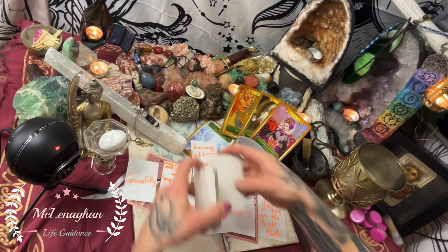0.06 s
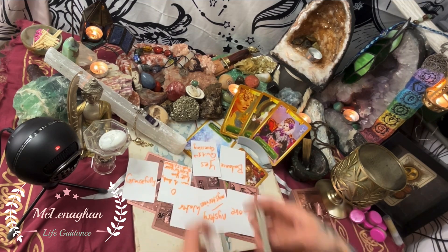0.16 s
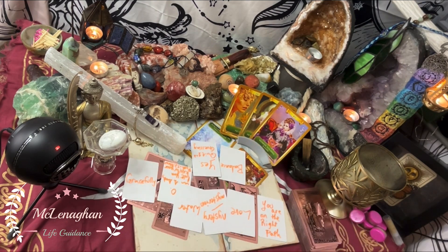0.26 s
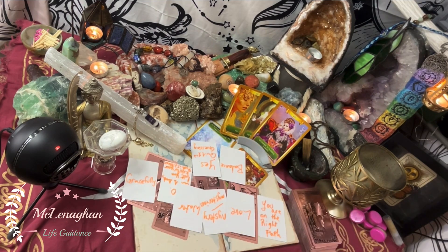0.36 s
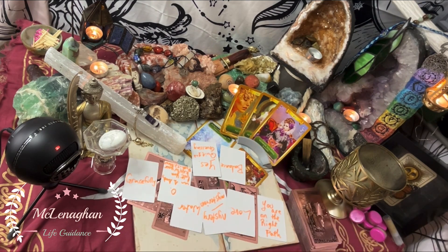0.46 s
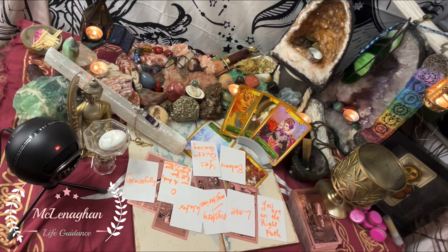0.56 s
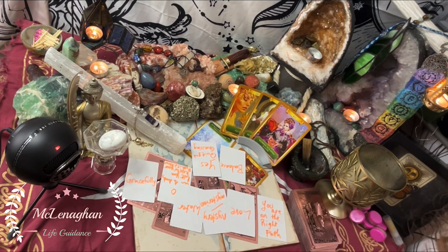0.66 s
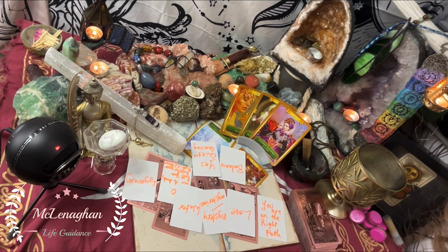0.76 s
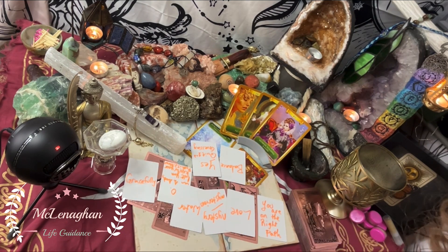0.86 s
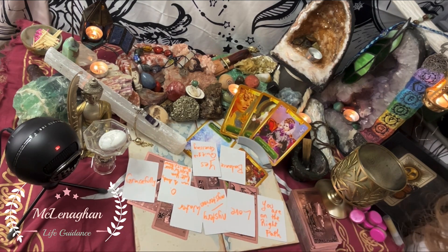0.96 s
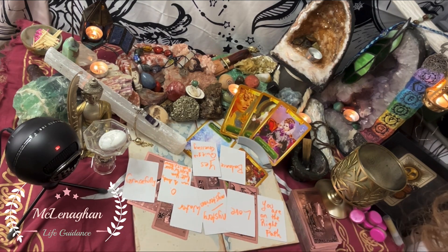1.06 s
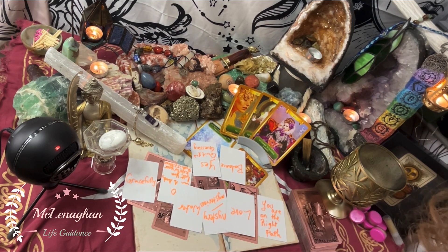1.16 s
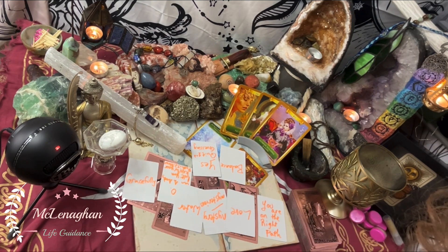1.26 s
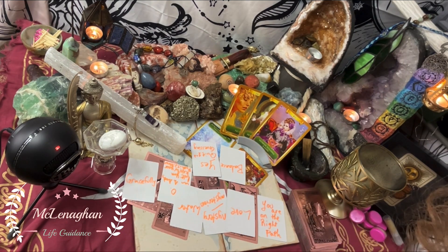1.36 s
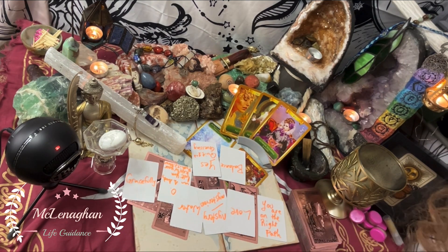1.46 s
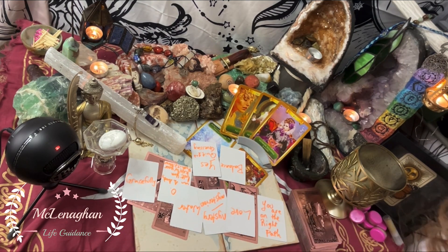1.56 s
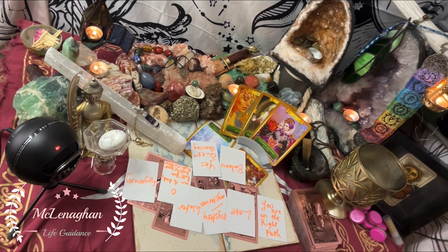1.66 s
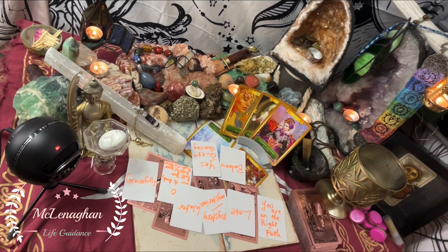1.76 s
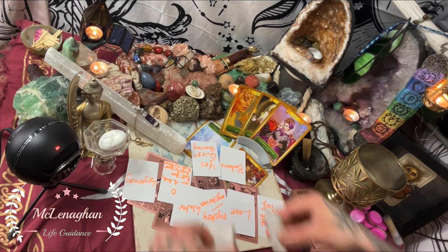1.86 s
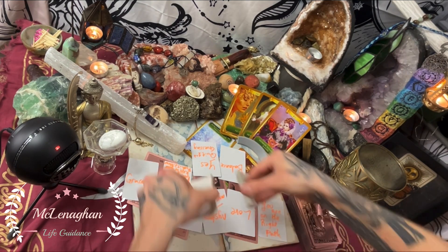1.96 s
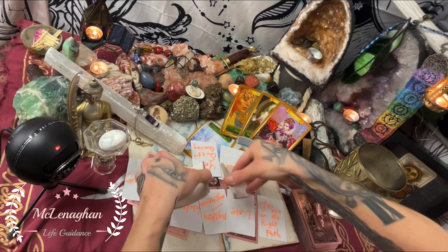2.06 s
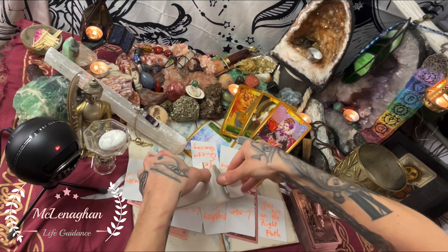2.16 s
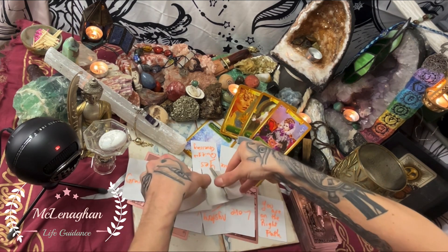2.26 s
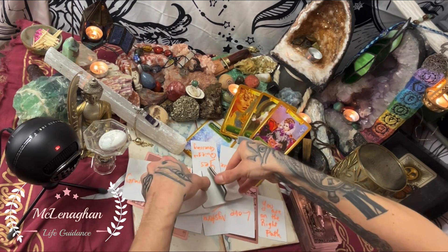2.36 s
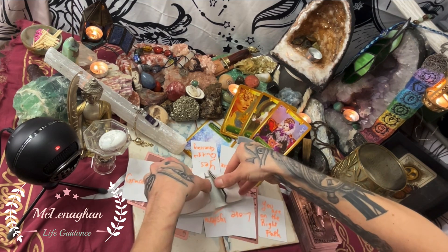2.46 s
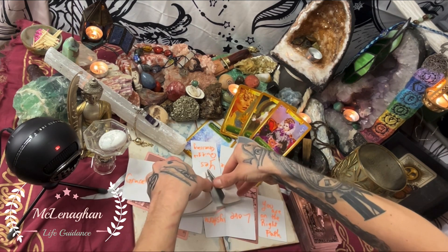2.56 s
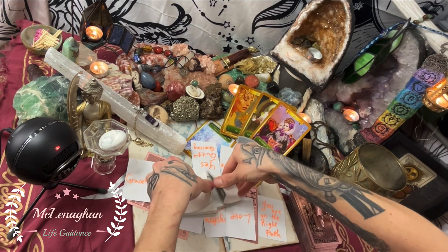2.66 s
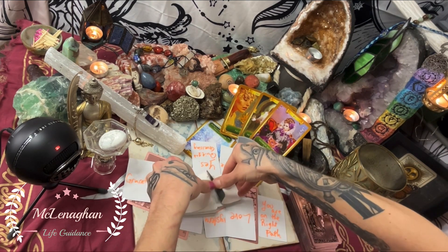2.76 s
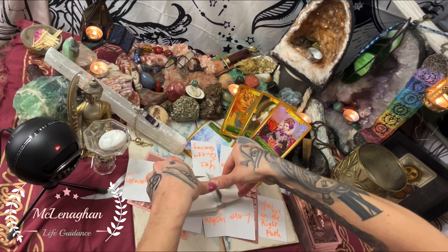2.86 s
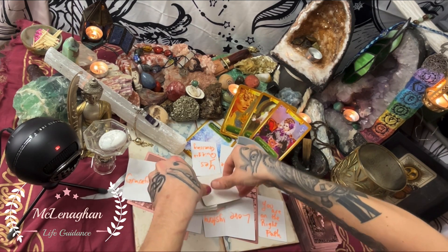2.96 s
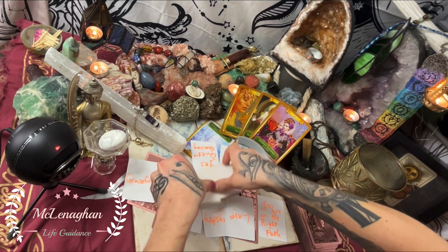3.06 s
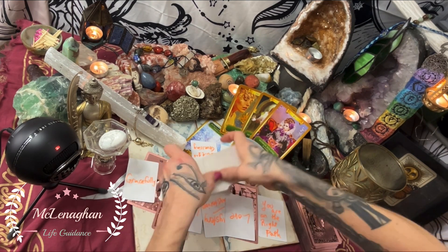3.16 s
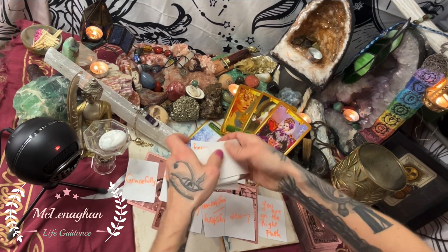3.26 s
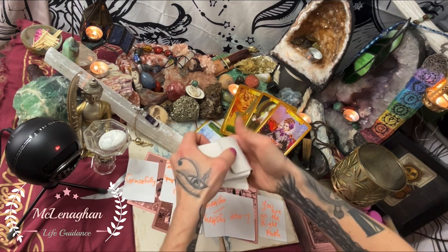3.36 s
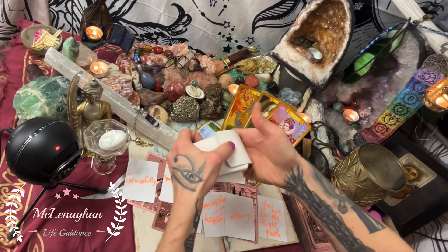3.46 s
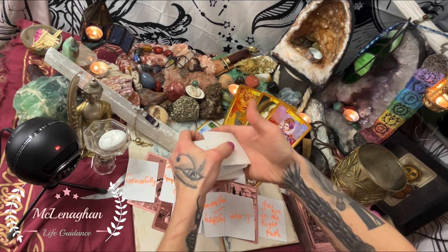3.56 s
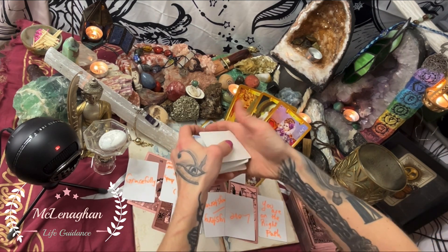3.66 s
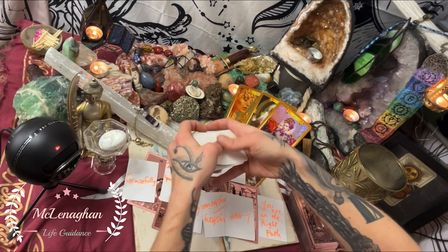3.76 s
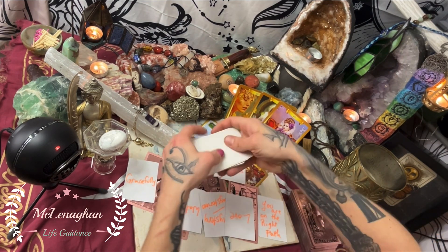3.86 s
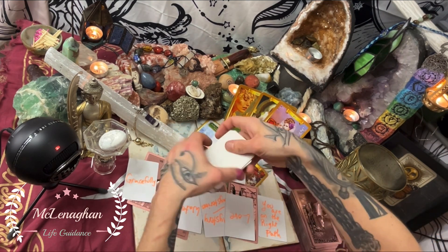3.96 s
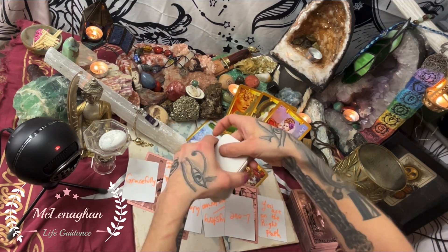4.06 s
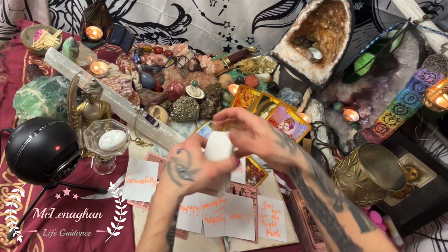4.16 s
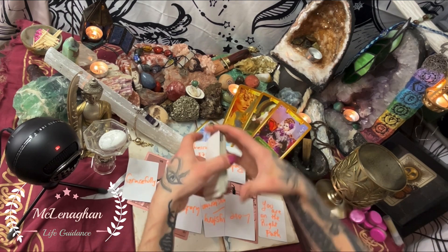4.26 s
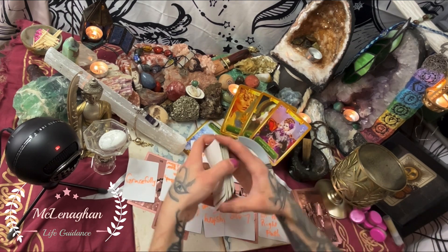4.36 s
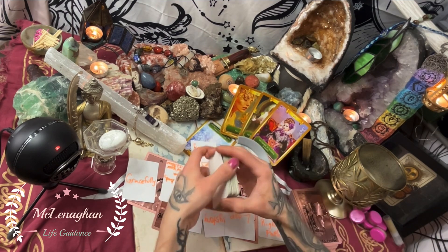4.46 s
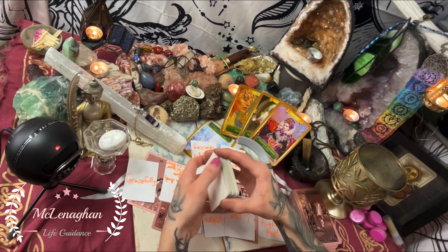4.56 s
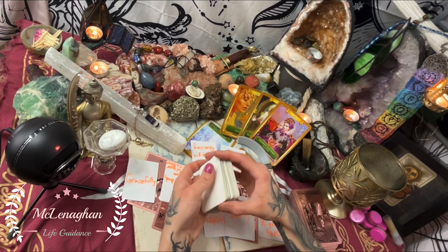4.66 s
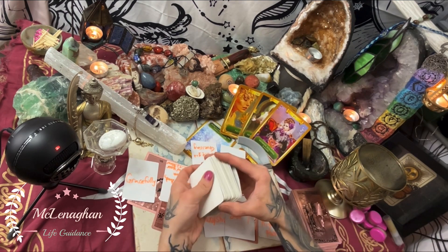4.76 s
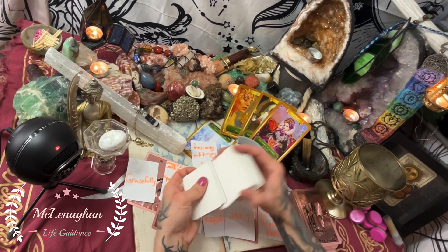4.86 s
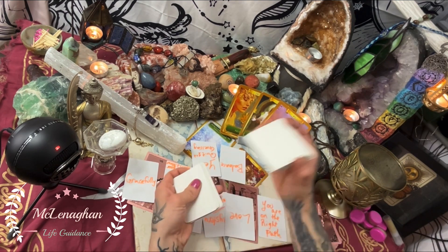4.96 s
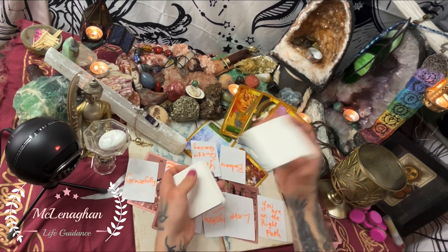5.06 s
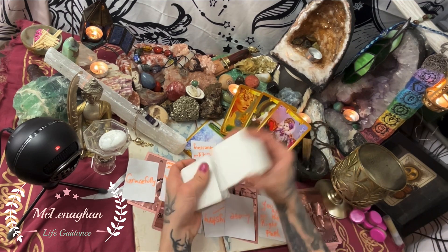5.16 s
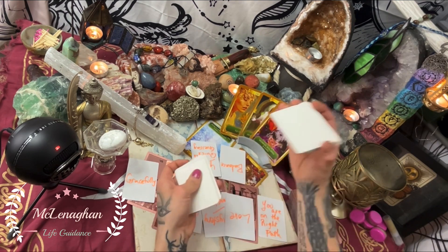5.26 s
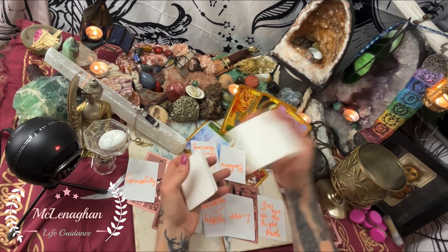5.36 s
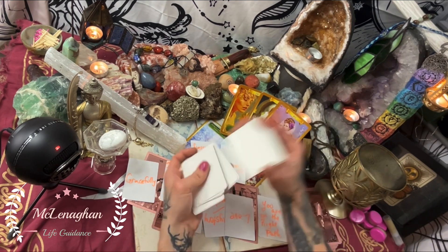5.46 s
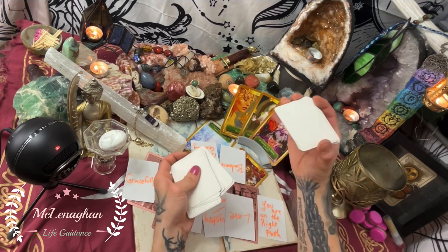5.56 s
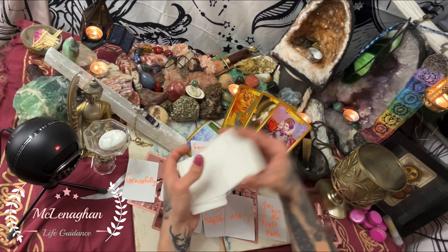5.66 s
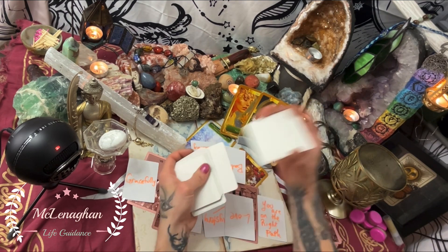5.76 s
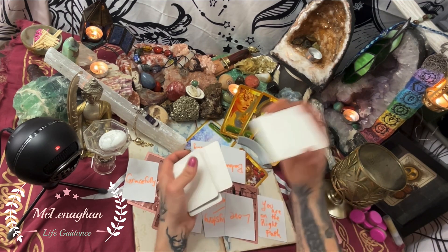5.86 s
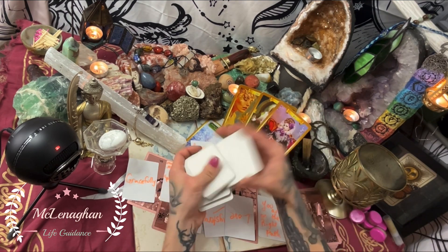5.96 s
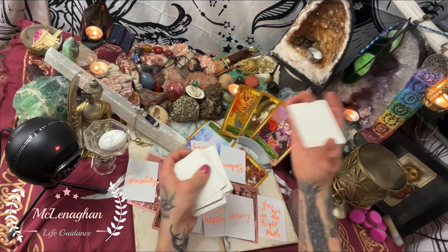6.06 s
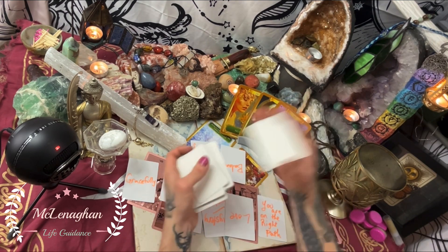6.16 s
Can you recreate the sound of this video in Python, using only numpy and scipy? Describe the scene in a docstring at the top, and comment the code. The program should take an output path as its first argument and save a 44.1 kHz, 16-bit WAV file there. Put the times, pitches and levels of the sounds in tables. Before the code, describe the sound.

In a quiet room with a low fan hum, small stiff cards riffle in crisp snapping bursts, then slide and flick loosely close by.

```python
"""Quiet room with a humming fan: hands shuffle small stiff cards over a table, close to a microphone.
Snaps: crackly noise bursts through edge colour, card ring and air pocket. Corner ticks: noise-driven pings.
Slides: high-passed friction hiss with fine catches, over a steady rustle. A short echo follows the cards.
Springy stand: decaying pushes, ringing and slow sway. Fan: shaped noise and wavering tones."""
import sys
import numpy as np
from scipy import signal
from scipy.fft import rfft, irfft
from scipy.io import wavfile
from scipy.ndimage import uniform_filter1d

SR = 44100
rng = np.random.default_rng(int(sys.argv[2]) if len(sys.argv) > 2 else 0)


def volts(x):
    """Linear amplitude factor 10**(x/20) for a level x in dB, scalar or array-like."""
    e = np.asarray(x, float) / 20
    return 10 ** e


def dump(signal):
    """Clip the signal to [-1, 1] and save it as 16-bit WAV at the path in sys.argv[1]."""
    limited = np.clip(np.atleast_2d(signal).T, -1, 1)
    pcm = np.round(limited * 32767).astype(np.int16)
    wavfile.write(sys.argv[1], SR, pcm)


N = 274331

# card edges snapping free or slapping down: (time [s], relative snap level [dB],
# card ring over snap [dB], air pocket over snap [dB], main decay t60 [ms])
SNAP_EVENTS = [(1.648, -45, -7, -17, 4.4), (2.158, -41, -4, 7, 5), (2.1672, -40.5, -3, 10.5, 14),
               (2.1806, -24.5, -6, 1, 16.2), (2.1907, -21.5, 2, 3.5, 10.3), (2.202, -15, 0.5, -4, 5.7),
               (2.3079, -32, 2, 6, 8.4), (2.315, -23.5, 3.5, 3.5, 12.2), (2.3204, -23.5, -11, 0, 16),
               (2.349, -33, -20, -7, 6.1), (2.4157, -40.5, -4, 4, 21), (2.43, -37, -3, 3.5, 32.6),
               (2.4823, -36.5, 4, 3, 6.2), (2.4904, -39.5, 0, -7, 12.6), (2.517, -26, -1, -5, 11),
               (2.5214, -24, -8, -4, 19.6), (2.533, -18, 10.5, 4.5, 5.4), (2.5409, -23, 3, 2.5, 6.4),
               (2.5489, -29.5, -2, 6.5, 19.3), (2.5611, -36.5, 9, 12, 13), (2.65, -27, -7, -2.5, 28),
               (2.6598, -21.5, 2.5, -11, 8.7), (2.6651, -28, 0.5, 4, 36.6), (2.677, -22.5, -18, 0, 10.4),
               (2.686, -22.5, -10, 0.5, 14), (2.696, -18, -6, -3.5, 14), (2.703, -25, -14, -13, 14),
               (2.7801, -40, -8, 9, 9.2), (2.7855, -16.5, -9.5, -2.5, 23), (2.848, -33.5, 1.5, 3, 14.6),
               (2.858, -33, -1, 2.5, 10), (2.904, -14, -16, -16, 11), (2.9065, -15.5, -10.5, -1.5, 18.1),
               (3.0328, -37, -9.5, -0.5, 11.7), (3.108, -45.5, 3.5, 6.5, 11.5),
               (3.19, -43.5, -20, -20, 6.7), (3.2093, -37, -14, -3.5, 9.9), (3.323, -28.5, -4, 3, 19),
               (3.394, -37.5, -23, -27, 15.7), (3.501, -29.5, 4.5, -11, 25),
               (3.5571, -29.5, -1.5, -7, 11.3), (3.6026, -41, -5, -4, 33), (3.62, -39.5, -8, -5, 13.7),
               (3.6692, -26.5, -29, -32, 6.6), (3.822, -39.5, -0.5, -2.5, 8.2), (3.832, -43, 5, -2, 9.1),
               (4.124, -32, -1, -14, 8), (4.167, -35.5, -24, -5, 7), (4.76, -37.5, -26, -13, 8.1),
               (4.828, -48.5, 7, 6, 15), (4.895, -40.5, -12.5, -3, 5.5), (5.165, -40.5, -5.5, -2.5, 37),
               (5.1899, -29.5, -3.5, -21, 7.5), (5.2075, -28.5, -24, -13, 4), (5.42, -29, -4, -1, 19.4),
               (5.4248, -32, 6.5, 4.5, 10.8), (5.427, -29.5, 0, 0, 7.9), (5.438, -35, -6, 0, 6.1),
               (5.44, -27.5, -5, -4, 5.1), (5.4477, -32, -4, -10, 7.5), (5.451, -33, -20, -14, 24),
               (5.47, -46, 3, -12, 8.8), (5.4819, -31.5, -19, -8, 4.9), (5.501, -39, -6, 3, 6.8),
               (5.7002, -24, 6.5, -1, 11.08), (5.7124, -29.5, -2, -7.5, 40), (5.731, -30, -7, -0.5, 7),
               (5.736, -33, -13, -5, 9.7), (5.7505, -38.5, -10, 1, 26.4), (5.9585, -36.5, -4, -6, 9.7),
               (5.961, -36.5, -6, 1.5, 19), (5.981, -21.5, -4, -12, 3.5), (5.986, -33.5, -16, 7.5, 21.3),
               (5.9944, -33, -8, -2, 9.5), (5.9977, -36, -21, 16, 8.4), (6.2167, -23, 0, 3, 7.5)]
# bare card edge spectrum: (frequency [Hz], relative density [dB per Hz])
EDGE_SPECTRUM = [(1500, -10), (3500, -4), (4500, 0), (7000, -4), (10000, -4), (13500, -14), (16500, -14.5)]
# brighter edges of loose cards facing the microphone: (frequency [Hz], relative boost [dB])
LOOSE_EDGE_BOOST = [(9000, 3), (13000, 6)]
# how the hands bow and cup the deck: (time [s], card ring [Hz], air pocket [Hz])
GRIP = [(2.185, 2830, 1150), (2.3, 2700, 1060), (2.79, 2870, 1080), (2.9, 2830, 1050), (3.5, 2330, 1260),
        (3.56, 2740, 1140), (5.43, 2470, 1270), (5.7, 2360, 1060)]
# card corners ticking past a thumb: (time [s], drive level [dB])
TICK_EVENTS = [(3.575, -47), (3.578, -45), (3.589, -49), (3.616, -52)]
# card faces and fingers sliding: (middle [s], level before taper and patches [dB], half-length [ms])
SLIDE_EVENTS = [(.12, -61.5, 50), (.325, -59.5, 37), (0.354, -58.5, 14), (.462, -61.5, 27), (.565, -61, 11),
                (0.836, -58.5, 53), (.975, -60, 37), (1.378, -55.5, 5.6), (2.19, -35.5, 34),
                (2.44, -56, 16), (2.543, -32.5, 28), (2.686, -31.5, 38), (3.037, -51.5, 29),
                (3.117, -54, 22), (3.255, -55, 29), (3.505, -36, 23.7), (3.575, -53, 65),
                (3.627, -53.5, 35), (3.794, -53, 24), (3.838, -55, 32), (4.04, -59, 57), (4.14, -58.5, 72),
                (4.356, -56, 21), (4.44, -56.5, 12), (4.47, -58.5, 108), (4.531, -54, 21),
                (4.83, -60.5, 88), (4.898, -56.5, 23), (5.036, -61, 15), (5.92, -59.5, 14),
                (6.11, -62.5, 43)]
# friction hiss spectrum: (frequency [Hz], relative density [dB per Hz])
SLIDE_SPECTRUM = [(2600, 7.5), (3200, -3), (4100, 5.5), (5200, -3.5), (7000, -1), (10000, -1.5),
                  (16000, -4)]
# steady rustle of hands and sleeves: (time [s], base level [dB])
RUSTLE_LEVEL = [(0, -66.5), (1.1, -67), (2.1, -72.5), (2.4, -62.5), (2.95, -62.5), (3.5, -56.5),
                (3.95, -68.5), (4.8, -62.5), (5.0, -68), (5.6, -66.5), (6.22, -66)]
# echo decay: (frequency [Hz], t60 [s])
ECHO_T60 = [(300, 0.1), (2000, 0.22), (12000, 0.15)]
# blows reaching the stand through the table: (time [s], push drive [dB], push pitch [Hz], stand ring [dB])
BLOWS = [(2.18, -43, 70, -39), (2.318, -30.5, 70, -28), (2.537, -47, 62, -33.5), (2.665, -38, 120, -62),
         (2.851, -36.5, 156, -46), (2.903, -54, 140, -43), (3.3235, -33, 453, -70), (4.894, -48, 90, -75),
         (5.207, -41.5, 58, -68), (5.498, -35.5, 56.3, -60), (5.749, -30, 61, -68), (5.98, -35.5, 92, -52)]
# slow sway of the stand: (time [s], level [dB])
SWAY_LEVEL = [(0, -81), (.75, -48.5), (1.3, -68.5), (2.6, -47), (3.0, -41), (3.6, -53.5), (4.6, -64),
              (6.22, -54)]
# fan wash spectrum: (frequency [Hz], relative density [dB per Hz])
WASH_SPECTRUM = [(15, -8.5), (50, -8.5), (150, -13.5), (240, -12.5), (345, -11), (550, -18.5), (680, -15),
                 (850, -19.5), (1200, -12.5), (1700, -23), (2600, -30), (4000, -37.5), (8000, -42),
                 (16500, -69)]
# fan tones: (multiple of HUM_HZ [-], rms level [dB])
HUM_TONES = [(2, -62.5), (4, -69), (6, -68)]

CARD_WIDTH_HZ, POCKET_WIDTH_HZ = 770, 370
# strong card rings (whole card bends) take the low grip pitch; faint ones (a corner flicks) rise
# to CORNER_HZ, the faintest beyond it
CORNER_HZ, BEND_KNEE_DB, BEND_RANGE_DB = 4260, -11.5, 2.5
RIFFLE_END_S = 3.0  # later cards are loose
TICK_HZ, TICK_WIDTH_HZ = 8200, 410
# the harder the faces press, the lower the hiss reaches: from LIGHT_HZ at LIGHT_DB down to FULL_HZ
LIGHT_HZ, LIGHT_DB, DB_PER_OCTAVE, FULL_HZ = 5220, -61.5, 5, 1460
STAND_HZ, STAND_T60_S = 38, 0.88
SWAY_HZ, SWAY_WIDTH_HZ = 22, 4.3
KNOCK_HZ = 295  # a blow pitched this high rings for twice as many cycles as a dull push
HUM_HZ, WASH_DB = 105.2, -54.5
BAND_EDGE_HZ = 15760


def evened(x):
    """Scales to rms 1."""
    return x / np.sqrt(np.mean(x ** 2) + 1e-20)


def read(points, hz):
    """Reads a spectrum on a log-frequency axis."""
    point_hz, value = np.transpose(points)
    return np.interp(np.log(hz + 1), np.log(point_hz + 1), value)


def curve(rows):
    """Gain per sample from (time [s], level [dB]) rows."""
    return volts(np.interp(np.arange(N) / SR, *np.transpose(rows)))


def add(mix, time_s, sound):
    """Mixes a sound in at time_s."""
    part = mix[max(round(time_s * SR), 0):][:len(sound)]
    part += sound[:len(part)]


def colour(points, size=1024):
    """Causal minimum-phase filter of energy 1 with the given spectrum."""
    half = np.log(volts(read(points, np.fft.rfftfreq(size, 1 / SR))))
    full = signal.hilbert(np.r_[half, half[-2:0:-1]])
    taps = np.fft.ifft(np.exp(np.conj(full))).real
    return taps / np.linalg.norm(taps)


def ring(hz, width_hz, size=1024):
    """Impulse response of energy 1 of one damped mode."""
    t_s = np.arange(size) / SR
    taps = np.exp(-np.pi * width_hz * t_s) * np.sin(2 * np.pi * hz * t_s)
    return taps / np.linalg.norm(taps)


def crackle(spread_db, clump):
    """Noise whose size jumps in clumps of samples, as fibres catch and let go."""
    size_db = spread_db * evened(uniform_filter1d(rng.standard_normal(N), size=clump))
    return evened(volts(size_db) * rng.standard_normal(N))


def fuzzy_tone(hz, width_hz):
    """Noise in a narrow resonance: a carrier under doubly low-passed complex noise."""
    pole = np.exp(-np.pi * width_hz / SR)
    slow = rng.standard_normal(N + SR) + 1j * rng.standard_normal(N + SR)
    slow = signal.lfilter([1], np.convolve([1, -pole], [1, -pole]), slow)[SR:]
    carrier = np.exp(2j * np.pi * hz * np.arange(N) / SR)
    return evened((slow * carrier).real)


def patchy(x, spread_db, size=10):
    """Colours in patches, about 1 kHz by size frames of 1.5 ms, as cards bend and hands cover them."""
    z = signal.stft(x, nperseg=256, noverlap=192)[2]
    patches = uniform_filter1d(rng.standard_normal(z.shape), size=6, axis=0)
    patches = uniform_filter1d(patches, size=size, axis=1)
    z = z * volts(spread_db * evened(patches))
    return signal.istft(z, nperseg=256, noverlap=192)[1][:len(x)]


def burst_through(taps, grit, at, shape, blow_db):
    """Shaped grit with a one-sample blow at its peak, through taps, scaled to the energy of the shape."""
    burst = np.take(grit, at + np.arange(len(shape)), mode="wrap") * shape
    burst[shape.argmax()] -= volts(blow_db) * shape.max()
    sound = signal.oaconvolve(burst, taps)
    return sound * np.linalg.norm(shape) / np.linalg.norm(sound)


def snaps(rise_share=.09, tail_db=-16, tail_factor=4, pocket_lag_ms=1.3, crack_db=13, knock_db=17):
    """Sharp crack in a crackly burst: bare edge noise, the card's bending ring, the air pocket below."""
    t_ms, edge, body = np.arange(4000) / SR * 1000, np.zeros(N), np.zeros(N)
    grit, bare = crackle(2.84, clump=30), colour(EDGE_SPECTRUM, size=256)
    bright = np.convolve(bare, colour(LOOSE_EDGE_BOOST, size=64))
    bright /= np.linalg.norm(bright)
    grip_s, grip_card_hz, grip_pocket_hz = np.transpose(GRIP)

    for time_s, snap_db, card_db, pocket_db, t60_ms in SNAP_EVENTS:
        rise_ms = rise_share * t60_ms  # long slaps land gradually, short snaps at once
        rise = 1 - np.exp(-(t_ms / rise_ms) ** 2)
        flutter = volts(tail_db - 60 * t_ms / (tail_factor * t60_ms))
        shape = volts(snap_db) * rise * (volts(-60 * t_ms / t60_ms) + flutter)
        start_s, at = time_s - rise_ms / 1000, round(time_s * SR)

        edge_taps = bare if time_s < RIFFLE_END_S else bright
        add(edge, start_s, burst_through(edge_taps, grit, at, shape, crack_db))

        corner = 1 / (0.5 + np.exp((card_db - BEND_KNEE_DB) / BEND_RANGE_DB))
        card_hz = np.interp(time_s, grip_s, grip_card_hz) * (1 - corner) + CORNER_HZ * corner
        bend = ring(card_hz, CARD_WIDTH_HZ, size=128)
        bend = np.convolve(bend, bend)  # steep flanks
        add(body, start_s, volts(card_db) * burst_through(bend, grit, at + SR, shape, knock_db))

        pocket = ring(np.interp(time_s, grip_s, grip_pocket_hz), POCKET_WIDTH_HZ)
        squeezed = volts(pocket_db) * burst_through(pocket, grit, at + 2 * SR, shape, knock_db)
        add(body, start_s + pocket_lag_ms / 1000, squeezed)  # air is squeezed last
    return volts(2.5) * (patchy(edge, 2.2) + body)


def ticks():
    """Each corner gives one tiny bright ping: a short noise burst drives a damped mode."""
    out, ping = np.zeros(N), ring(TICK_HZ, TICK_WIDTH_HZ, size=128)
    for time_s, drive_db in TICK_EVENTS:
        add(out, time_s, volts(drive_db) * np.convolve(rng.standard_normal(60), ping))
    return out


def slides(catches_per_s=400, catch_db=0, firm_db=-48, light_taper=.8):
    """Friction hiss swells and fades per stroke, with fine ticks as edges catch, over steady rustle."""
    catches = (rng.random(N) < catches_per_s / SR) * rng.exponential(1, N)
    catches = volts(catch_db) * signal.lfilter([1], [1, -.97], catches)  # each dies in about 1 ms
    hiss = signal.oaconvolve(crackle(1.7, clump=60), colour(SLIDE_SPECTRUM))[:N]
    # sleeves stir in short brushes
    stirring = volts(2.16 * evened(uniform_filter1d(rng.standard_normal(N), size=1500)))
    out = curve(RUSTLE_LEVEL) * stirring * hiss
    for middle_s, level_db, half_ms in SLIDE_EVENTS:
        start_s = middle_s - half_ms / 1000
        taper = 1 if level_db > firm_db else light_taper
        stroke = signal.windows.tukey(round(2 * half_ms / 1000 * SR), taper)
        under = slice(round(start_s * SR), round(start_s * SR) + len(stroke))
        catching = min(volts(level_db - firm_db), 1) * catches[under]  # light brushes hardly catch
        lowest_hz = max(LIGHT_HZ * 2 ** ((LIGHT_DB - level_db) / DB_PER_OCTAVE), FULL_HZ)
        high_pass = signal.butter(3, lowest_hz, "high", fs=SR, output="sos")
        rub = evened(signal.sosfilt(high_pass, hiss[under] * (1 + catching)))
        add(out, start_s, volts(level_db) * stroke * rub)
    return patchy(out, 2.8, size=24)


def echo(x):
    """Short diffuse return from the table top and things on it: noise decaying per frequency."""
    taps = rng.standard_normal(SR // 4) * (np.arange(SR // 4) > 130)  # silent first 3 ms
    hz, t_s, z = signal.stft(taps, SR, nperseg=128)
    decay = volts(-60 * t_s / read(ECHO_T60, hz)[:, None])
    tail = signal.istft(z * decay, SR, nperseg=128)[1]
    return signal.oaconvolve(x, tail / np.linalg.norm(tail))[:N]


def stand(push_cycles=0.58, rise_cycles=0.11, rough=0.33, rough_hz=500):
    """Each blow is a rough decaying push that sets the stand ringing; it also sways slowly."""
    t_s = np.arange(SR) / SR
    out = curve(SWAY_LEVEL) * fuzzy_tone(SWAY_HZ, SWAY_WIDTH_HZ)
    low_pass = signal.butter(2, rough_hz, fs=SR, output="sos")
    judder = evened(signal.sosfilt(low_pass, rng.standard_normal(SR)))
    for time_s, push_db, push_hz, ring_db in BLOWS:
        decay = np.exp(-t_s * push_hz / (push_cycles * (1 + push_hz / KNOCK_HZ)))
        rise = 1 - np.exp(-t_s * push_hz / rise_cycles)
        push = 2 * volts(push_db) * rise * decay * np.sin(2 * np.pi * push_hz * t_s)
        push *= 1 + rough * np.roll(judder, round(time_s * SR))
        ringing = volts(ring_db - 60 * t_s / STAND_T60_S) * np.sin(2 * np.pi * STAND_HZ * t_s)
        add(out, time_s, push + ringing)
    return out


def fan(waver=0.00811):
    """Wash of shaped noise, and tones whose common speed wavers slightly (rms share)."""
    wash_gain = volts(read(WASH_SPECTRUM, np.fft.rfftfreq(N, 1 / SR)))
    wash = irfft(rfft(rng.standard_normal(N)) * wash_gain, N)
    speed = 1 + waver * evened(uniform_filter1d(rng.standard_normal(N), size=6000))
    turns = np.cumsum(HUM_HZ * speed) / SR
    tones = np.zeros(N)
    for multiple, level_db in HUM_TONES:
        phase_turns = multiple * turns + rng.random()
        tones += volts(level_db) * np.sqrt(2) * np.sin(2 * np.pi * phase_turns)
    return volts(WASH_DB) * evened(wash) + tones


def scene():
    """Cards with their echo, the shaken stand and the fan."""
    cards = snaps() + ticks() + slides()
    return (cards + volts(-18.5) * echo(cards) + stand() + fan())[None]


def roll_off(x):
    """The treble ends steeply here."""
    return signal.sosfilt(signal.butter(12, 16990, fs=SR, output="sos"), x)


def record(dry):
    """Steep low-pass band edge that lets a trace of the treble through."""
    low_pass = signal.firwin(801, BAND_EDGE_HZ, window=("kaiser", 8), fs=SR)
    kept = signal.oaconvolve(dry, low_pass[None], "same")
    mix = kept + volts(-28) * (dry - kept)
    return roll_off(mix)


dry = scene()
out = record(dry)
dump(out)
```